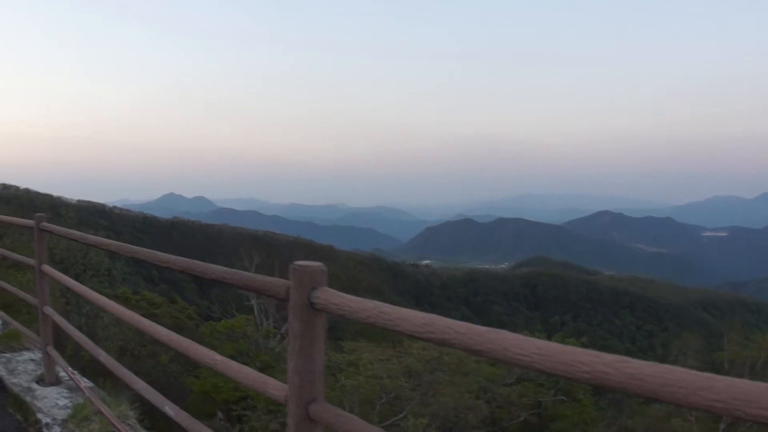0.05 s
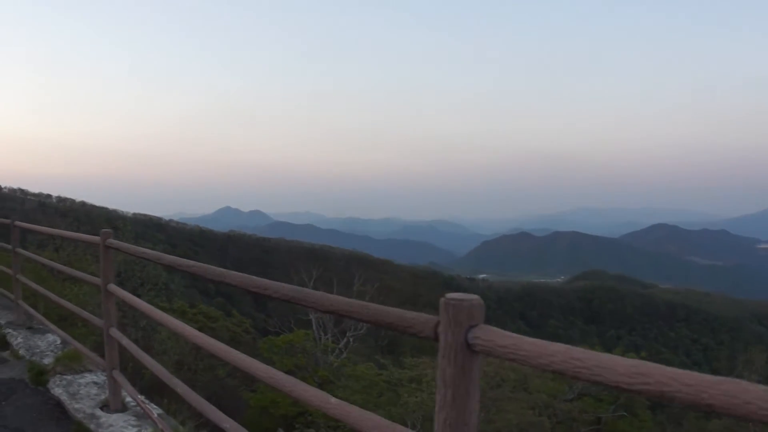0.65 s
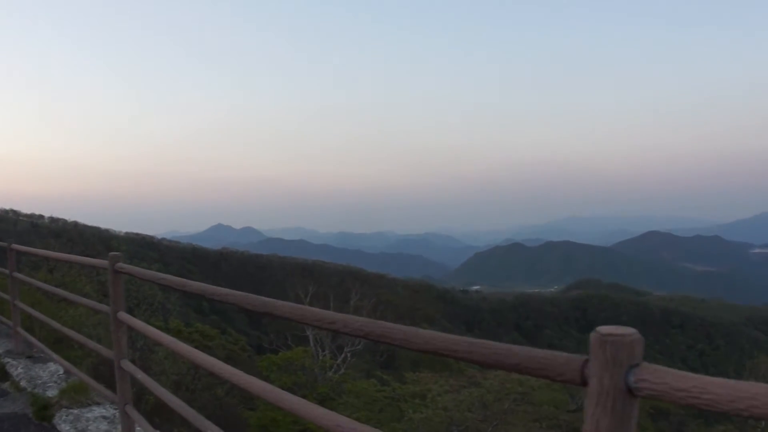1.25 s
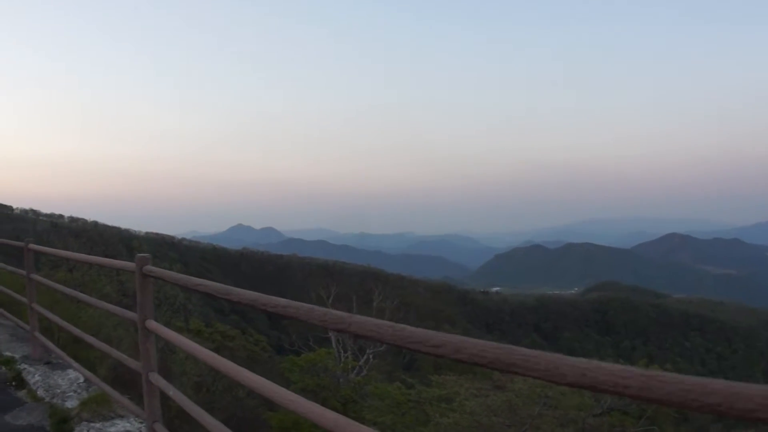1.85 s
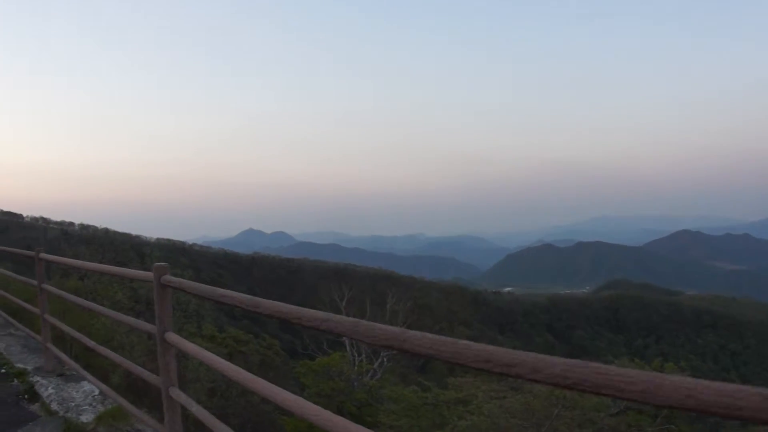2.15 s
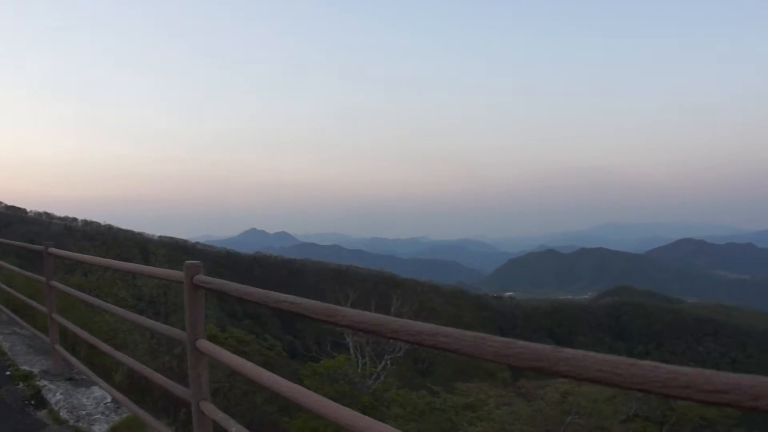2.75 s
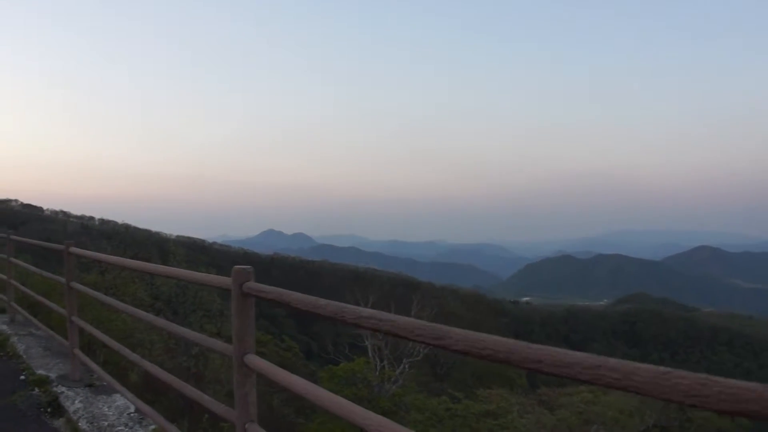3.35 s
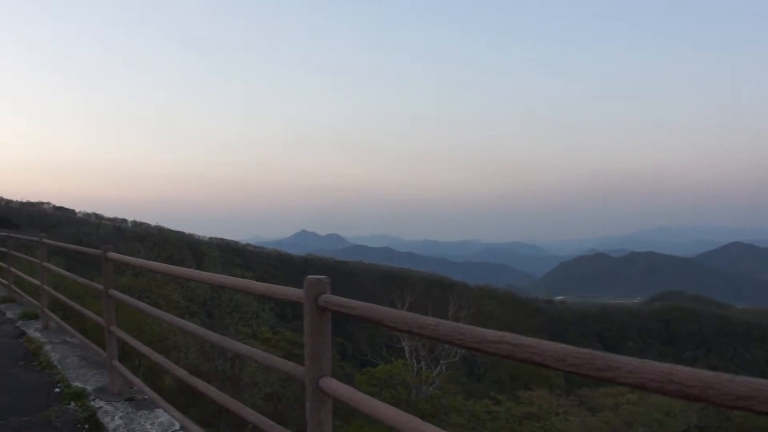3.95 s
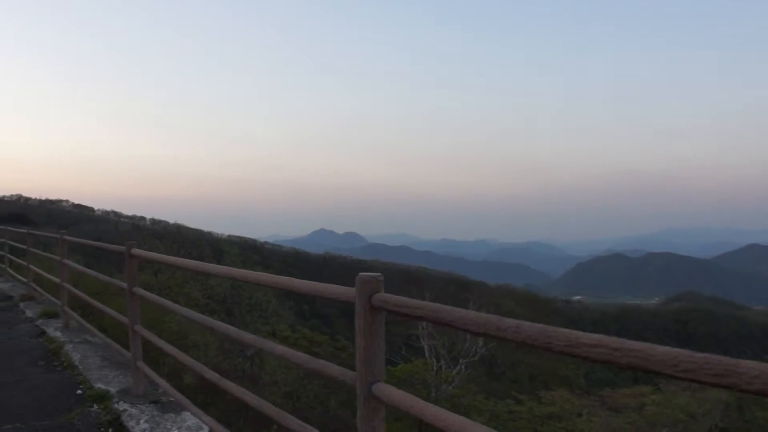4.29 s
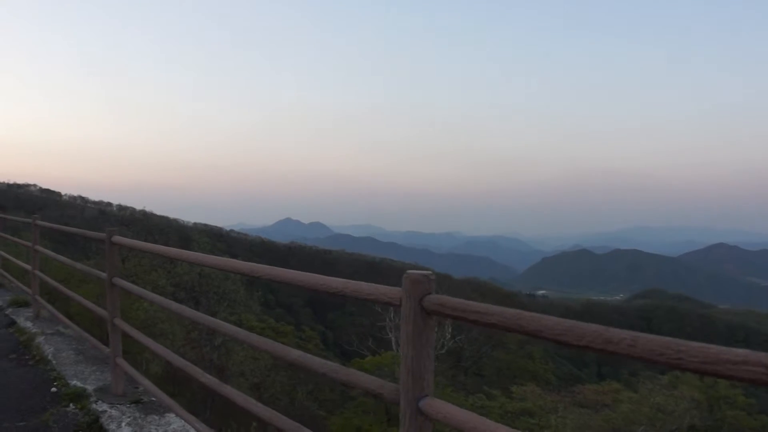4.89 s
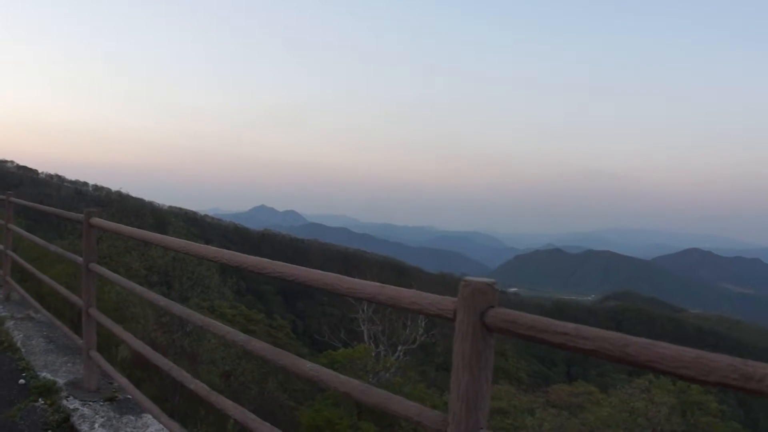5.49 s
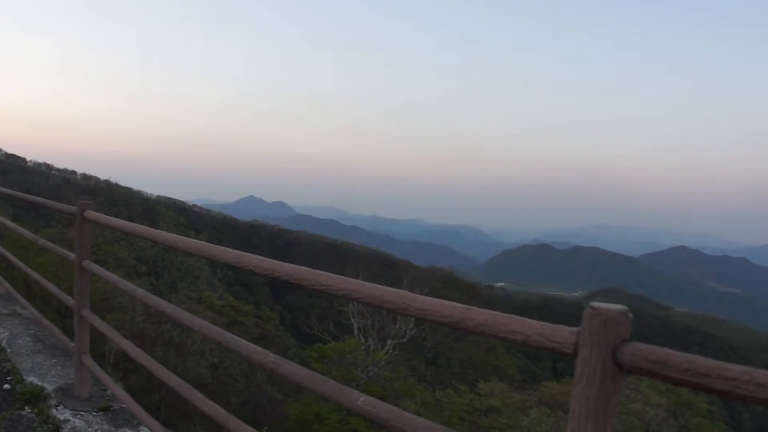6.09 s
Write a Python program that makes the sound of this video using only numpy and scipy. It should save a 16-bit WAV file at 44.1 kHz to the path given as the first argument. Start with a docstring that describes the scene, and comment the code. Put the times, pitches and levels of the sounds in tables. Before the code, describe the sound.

Outdoors, a little bird trills quickly and goes on with arched and falling chirps over light wind rumble and faint rushing air.

```python
"""Songbird on a windy hillside

A small bird, a little to the right, sings a fast trill, then alternates arched and falling chirps;
rising chirps open and close the song. Each note is one sweep of the syrinx, filtered by the throat
resonance and scattered by the trees. Behind it are a distant rush of air and one faint call;
close by, wind rumbles on a hand-held microphone, with a few ticks and scuffs."""
import sys
import numpy as np
from scipy import signal
from scipy.fft import rfft, irfft
from scipy.io import wavfile
from scipy.ndimage import uniform_filter1d

SR = 44100
rng = np.random.default_rng(int(sys.argv[2]) if len(sys.argv) > 2 else 0)


def digitize_waveform(pressure):
    """Quantize a signal to 16-bit integers and store it at the path in sys.argv[1].

    Rows of a 2-D input are taken as channels; values are limited to [-1, 1].
    """
    field = np.atleast_2d(pressure).T
    bounded = np.clip(field, -1, 1)
    quanta = np.round(bounded * 32767).astype(np.int16)
    wavfile.write(sys.argv[1], SR, quanta)


N = 274743
TIME = np.arange(N) / SR
FREQ = np.maximum(np.arange(N // 2 + 1) * SR / N, 1)


def undb(db):
    """Amplitude ratio of a level in decibels."""
    return 10 ** (np.asarray(db) / 20)


def unit(x):
    """Normalisation to rms 1."""
    return x / np.sqrt(np.mean(x ** 2))


def over_log(points, hz):
    """Interpolation of (f, value) points on a logarithmic frequency axis."""
    f, value = np.transpose(points)
    return np.interp(np.log(hz), np.log(f), value)


def bell(t, sigma):
    """Gaussian envelope of height 1 at t = 0."""
    return np.exp(-np.minimum((t / sigma) ** 2 / 2, 20))


def ease(x):
    """Raised-cosine step from 0 to 1."""
    return np.sin(np.pi / 2 * np.clip(x, 0, 1)) ** 2


def resonance(hz, width):
    """Magnitude response of a steep band-pass resonance."""
    return 1 / (1 + ((FREQ / hz - hz / FREQ) * hz / width) ** 4)


def noise(gain):
    """Spectral shaping of white noise, at rms 1."""
    return unit(irfft(rfft(rng.standard_normal(N)) * gain, N))


def drift(cutoff_hz):
    """Low-pass noise: a smooth random modulator of rms 1."""
    return noise(1 / (1 + (FREQ / cutoff_hz) ** 4))


def stereo_noise(spectrum, correlation):
    """Partial coherence: the ratio of common to opposed noise sets the channels' correlation."""
    mid, side = rfft(rng.standard_normal((2, N))) * undb(over_log(spectrum, FREQ))
    mid, side = mid * np.sqrt(1 + correlation), side * np.sqrt(1 - correlation)
    return unit(irfft(np.array([mid + side, mid - side]), N))


def pan(db):
    """Channel gains for a level difference, left minus right."""
    return undb(np.array([[db], [-db]]) / 2)


def delay(x, s):
    """Propagation delay of s seconds."""
    return np.interp(TIME - s, TIME, x, left=0)


def tree_echoes(x, start_s, t60):
    """Scattering by trunks and branches: sparse, exponentially decaying echoes, partly coherent."""
    t = TIME[:2 * SR]
    taps = rng.standard_normal((3, len(t))) * (rng.random((3, len(t))) < .05)
    response = (taps[0] + 0.68 * taps[1:]) * np.exp(-np.log(1000) * t / t60) * (t > start_s)
    return signal.fftconvolve(x[None], unit(response) / np.sqrt(len(t)), axes=1)[:, :N]


# Spectrum of the distant air: f/Hz, relative spectral level/dB
RUSH_SPECTRUM = [(100, 5), (250, 5), (450, 1.5), (750, 0.5), (1150, 3), (1700, -1), (2500, -2.5),
                 (4000, -11.5), (6000, -19.5), (10000, -36)]
# Likeness of its two channels: f/Hz, correlation coefficient
RUSH_CORRELATION = [(100, 0.93), (400, 0.79), (800, 0.8), (1300, 0.075), (3000, 0.31), (8000, 0.049)]


def distant_air():
    """Flow noise of air and leaves swells; a growing time difference draws it to the left."""
    swell = np.interp(TIME, [4.08, 5.73], [0, 1])
    left, right = stereo_noise(RUSH_SPECTRUM, over_log(RUSH_CORRELATION, FREQ))
    right = delay(right, s=.0001 + .00009 * swell)
    level_db = -54.5 + 6 * swell + 1.22 * drift(21.5)
    return np.array([left, right]) * undb(level_db) * pan(1.0)


# Spectrum of the microphone hiss: f/Hz, relative spectral level/dB
HISS_SPECTRUM = [(1000, -15.5), (4000, 1.5), (7000, 1), (11000, -0.5), (16000, -1)]


def microphone_hiss():
    """Self-noise: steady, broadband and almost uncorrelated between the channels."""
    return stereo_noise(HISS_SPECTRUM, correlation=0.06) * undb(-58.5)


def whine(first_s=0.26, period_s=1.525, length_s=.33):
    """Periodic gating of narrow-band noise: a faint high whine comes and goes."""
    gate = uniform_filter1d(1. * ((TIME - first_s) % period_s < length_s), size=2000)
    return gate * noise(resonance(hz=11400, width=800)) * undb(-73.5)


# Spectrum of the buffeting: f/Hz, relative spectral level/dB
BUFFET_SPECTRUM = [(8.8, -40), (15, -3), (38, 0.5), (54, 3.5), (97, -5.5), (147, -13.5), (179, -17),
                   (211, -19), (300, -24.5), (390, -68), (660, -120)]
# Slow course of the wind: t/s, relative level/dB
GUSTS = [(0.0, -50), (0.29, -54), (0.69, -45.5), (0.99, -50), (2.27, -51.5), (2.41, -47.5), (3.42, -49.5),
         (3.61, -50), (4.56, -56.5), (5.52, -51), (5.62, -52), (6.23, -50.5)]
# Single puffs on top of it: t/s, level rise/dB, Gaussian half-width/s
WIND_PUFFS = [(2.76, 4.5, .03), (2.94, 3.5, .025), (3.25, 5, 0.052), (5.372, 17, 0.033), (5.54, 9.5, .016),
              (6.2, 10, 0.012)]


def wind(gain_db=3, eddy_db=2, crossover_hz=115):
    """Turbulent pressure fluctuations buffet the microphone, a little more on the right."""
    gust_db = np.interp(TIME, *np.transpose(GUSTS)) + gain_db + eddy_db * drift(cutoff_hz=6)
    gust_db += sum(db * bell(TIME - s, width) for s, db, width in WIND_PUFFS)
    rumble = stereo_noise(BUFFET_SPECTRUM, correlation=over_log([(60, 0.78), (130, 0.88)], FREQ))
    rumble /= np.sqrt(uniform_filter1d(np.mean(rumble ** 2, axis=0), size=5000))  # even out its power
    # large eddies follow each gust fully, small ones only in part
    large = irfft(rfft(rumble) / (1 + (FREQ / crossover_hz) ** 6), N)
    small = rumble - large
    mean_db = np.mean(gust_db)
    small_db = mean_db + 0.57 * (gust_db - mean_db) - 1.5
    return large * undb(gust_db) * pan(-2.0) + small * undb(small_db) * pan(-0.51)


# Small dry ticks: t/s, level/dB, centre f/Hz, decay time/s
HANDLING_TICKS = [(0.085, -32, 2540, 0.00081), (3.02, -45, 1180, 0.0053), (3.349, -46, 1110, 0.0026),
                  (4.301, -45, 870, 0.0023), (4.381, -42.5, 1460, 0.0013), (4.4468, -41.5, 1500, 0.0018),
                  (4.543, -44.5, 1400, 0.0031), (4.554, -41, 2600, 0.0031), (4.928, -46.5, 1150, 0.0024),
                  (5.814, -42.5, 1460, 0.004), (6.112, -41.5, 1390, .0008)]
# Soft scuffs and bumps: t/s, level/dB, centre f/Hz, Gaussian half-width/s
HANDLING_SCUFFS = [(1.236, -49.5, 1040, 0.01), (1.56, -46, 390, 0.0035), (2.465, -50.5, 530, 0.0052),
                   (3.108, -52, 445, 0.013), (3.27, -47, 137, 0.055), (3.786, -57, 830, 0.055),
                   (4.785, -53, 790, 0.028)]


def handling():
    """Band-limited transients of handling: ticks decay exponentially, scuffs swell and fade."""
    out = np.zeros(N)
    for s, db, hz, decay in HANDLING_TICKS:
        age = np.maximum(TIME - s, 0)
        burst = rng.standard_normal(N) * (age > 0) * np.exp(-np.minimum(age / decay, 20))
        tick = irfft(rfft(burst) * resonance(hz, width=0.88 * hz), N)
        out += undb(db) * unit(tick) * np.sqrt(decay * SR / N)
    for s, db, hz, width_s in HANDLING_SCUFFS:
        out += undb(db) * noise(resonance(hz, width=.9 * hz)) * bell(TIME - s, width_s)
    return out * pan(.3)


def far_call(peak_s=2.101, centre_hz=944, octaves_per_s=17):
    """Exponential frequency sweep: one faint, low, upslurred whistle further off."""
    t = TIME - peak_s
    hz = centre_hz * 2 ** np.clip(octaves_per_s * t, -1, 1)
    hz *= 1 + 0.022 * drift(180)
    tone = np.sin(2 * np.pi * np.cumsum(hz) / SR)
    call = np.sqrt(2) * tone * undb(-47) * bell(t, sigma=0.011)
    return call + undb(-5) * tree_echoes(call, start_s=0.0029, t60=0.12)


def gesture(stretch, lead_s, tail_s, scoop, scoop_s, drop, drop_s, clear_s, husk, peak_s, swell_s):
    """Frequency and amplitude modulation of one note about its pitch crest; stretch scales all times."""
    t = np.arange(-int(lead_s * stretch * SR), int(tail_s * stretch * SR)) / SR / stretch
    pitch_ratio = 1 - scoop * ease(-t / scoop_s) - drop * ease(t / drop_s)
    # the rasp clears about clear_s before the crest, down to the share husk
    rasp = husk + (1 - husk) / (1 + np.exp((t + clear_s) / 0.0022))
    return t * stretch, pitch_ratio, rasp, bell(t - peak_s, swell_s)


# Transfer function of throat and beak: f/Hz, gain/dB
THROAT_RESPONSE = [(1000, -30), (1700, -16), (2200, -10), (3000, -2.5), (3700, -3), (4700, -11.5),
                   (6000, -15), (7200, -30.5), (9500, -15.5), (13000, -41)]


def syrinx(notes, shape, waver, onset_waver, rolloff_db, rough, gape, fray_db, fray_band_hz, forest_db):
    """Source and filter: a rasp clears to a whistle, shaped by the throat. Returns (direct, forest)."""
    out = np.zeros((2, N))
    flutter, buzz, grit = drift(220), drift(317), drift(670)
    fray = undb(fray_db) * noise(resonance(*fray_band_hz))  # centre, width
    for crest_s, crest_hz, stretch, whistle_db, overtone_db, rasp_db in notes:
        t, pitch_ratio, rasp, swell = gesture(stretch, **shape)
        i = int((crest_s + t[0]) * SR) + np.arange(len(t))
        hz = crest_hz * pitch_ratio * (1 + waver * flutter[i] + onset_waver * rasp * buzz[i])
        phase = 2 * np.pi * np.cumsum(hz) / SR
        envelope = rasp * undb(rasp_db) + (1 - rasp) * swell * undb(whistle_db)
        envelope *= np.sqrt(2) * signal.windows.tukey(len(i), .28)
        envelope *= (1 + rough * rasp * grit[i]) / np.hypot(1, rough * rasp)  # membranes beat unevenly
        note = np.sqrt(rasp) * fray[i]  # and their tone frays into noise
        for k in range(1, 5):
            clear_db = overtone_db - whistle_db + rolloff_db * (k - 2)
            partial_db = 0 if k == 1 else (1 - rasp) * clear_db - 1.3 * rasp * (k - 2)
            throat_db = over_log(THROAT_RESPONSE, k * hz / gape)  # a wider beak lifts the resonance
            note += undb(partial_db + throat_db) * np.sin(k * phase)
        out[0, i] += envelope * note
        out[1, i] += envelope * note * undb(forest_db - 1.3 * rasp)  # whistle carries further than rasp
    return out


# Rising notes: crest t/s, crest f/Hz, stretch, source level/dB of whistle, overtone, rasp
RISING_NOTES = [(.4255, 3550, .96, -35.5, -54, -44.5), (5.562, 3454, .88, -41.5, -34, -44),
                (6.077, 3590, 1.05, -48.5, -43, -54.5)]


def rising_chirps():
    """Upward frequency sweeps that end just after the crest."""
    shape = dict(lead_s=.038, tail_s=0.0075, scoop=.62, scoop_s=0.033, drop=0.038, drop_s=0.01,
                 clear_s=0.014, husk=.03, peak_s=0.00089, swell_s=.035)
    return syrinx(RISING_NOTES, shape, waver=0.012, onset_waver=0.0073, rolloff_db=-15, rough=0.4,
                  gape=1.017, fray_db=-11.5, fray_band_hz=(4430, 1100), forest_db=-8.5)


# Falling notes: crest t/s, crest f/Hz, stretch, source level/dB of whistle, overtone, rasp
FALLING_NOTES = [(2.083, 2800, 0.94, -37.5, -63, -50), (2.379, 2830, .88, -38, -68, -50),
                 (2.944, 2902, 0.81, -36.5, -67, -44), (3.300, 2650, .86, -43.5, -52, -42.5),
                 (3.548, 2640, 0.97, -41, -55, -51), (3.856, 2684, 1.13, -41, -55, -50),
                 (4.142, 2707, 0.87, -40, -64, -43), (4.506, 2693, 0.86, -43.5, -60, -37),
                 (4.831, 2584, 0.74, -49, -45, -44.5)]


def falling_chirps():
    """Downward frequency sweeps after a short, rough rise; the whistle swells on the descent."""
    shape = dict(lead_s=0.019, tail_s=0.043, scoop=.36, scoop_s=0.0119, drop=.235, drop_s=0.027,
                 clear_s=0.0016, husk=0.05, peak_s=0.023, swell_s=0.02)
    return syrinx(FALLING_NOTES, shape, waver=0.022, onset_waver=0.033, rolloff_db=-4, rough=0.74,
                  gape=0.88, fray_db=-13.5, fray_band_hz=(3640, 2200), forest_db=-9.5)


# Arched notes: crest t/s, crest f/Hz, stretch, source level/dB of whistle, overtone, rasp
ARCHED_NOTES = [(1.919, 2993, 1.07, -33, -49, -48.5), (2.238, 3153, 0.98, -34.5, -53, -46),
                (2.677, 3487, .92, -37, -47, -45), (3.092, 3045, 0.96, -40.5, -43, -46.5),
                (3.431, 2954, 0.98, -40, -45, -44.5), (3.743, 3154, 1.05, -33, -46, -46.5),
                (4.037, 3100, .97, -33, -49, -42.5), (4.338, 3057, .92, -35, -45, -40.5),
                (4.695, 3004, 1.04, -37.5, -48, -38), (5.025, 3155, 1, -41, -64, -46.5)]


def arched_chirps():
    """Frequency sweeps up and down again; the whistle peaks near the crest."""
    shape = dict(lead_s=.029, tail_s=.02, scoop=.48, scoop_s=.027, drop=0.317, drop_s=0.0378,
                 clear_s=0.0093, husk=.008, peak_s=0.0012, swell_s=0.014)
    return syrinx(ARCHED_NOTES, shape, waver=.006, onset_waver=0.022, rolloff_db=-14, rough=0.11,
                  gape=0.93, fray_db=-19.5, fray_band_hz=(3580, 2100), forest_db=-9)


# Notes of the trill: crest t/s, stretch, source level/dB of whistle
TRILL_NOTES = [(.502, 0.72, -29.5), (0.578, 0.98, -30), (.652, 0.7, -29), (.731, 0.85, -27),
               (.810, 0.83, -25.5), (.893, 0.87, -24.5), (.976, 0.9, -26.5), (1.057, 1.2, -28),
               (1.138, 1.27, -27), (1.218, 1.3, -27), (1.297, 1, -26), (1.383, 1.12, -27),
               (1.477, 0.99, -25), (1.569, .95, -27.5), (1.658, 0.95, -29)]


def trill(base_hz=3098, sharp_hz=169, settle_s=0.045, sag_hz_per_s2=150.4):
    """A nearly periodic train of sweeps whose pitch starts sharp, settles, then sags ever faster."""
    notes = []
    for crest_s, stretch, whistle_db in TRILL_NOTES:
        age = crest_s - TRILL_NOTES[0][0]
        hz = base_hz + sharp_hz * np.exp(-age / settle_s) - sag_hz_per_s2 * age ** 2
        overtone_db = -50.5 + 6.5 * bell(age - 0.49, sigma=0.078)  # brighter in mid-phrase
        rasp_db = -37.5 - 27 * age
        notes.append((crest_s, hz, stretch, whistle_db, overtone_db, rasp_db))
    shape = dict(lead_s=.018, tail_s=0.026, scoop=.48, scoop_s=.021, drop=0.0726, drop_s=0.0264,
                 clear_s=0.0071, husk=0.0019, peak_s=0.013, swell_s=0.01)
    return syrinx(notes, shape, waver=0.0067, onset_waver=0.053, rolloff_db=-5.0, rough=0.73,
                  gape=0.95, fray_db=-18, fray_band_hz=(3680, 4700), forest_db=-9.5)


def songbird():
    """Multipath propagation: the song arrives from the right directly, off the ground and off trees."""
    direct, into_forest = rising_chirps() + trill() + arched_chirps() + falling_chirps()
    ground = undb(-11.5) * delay(direct, s=.0125)
    trunks = undb(-5.5) * tree_echoes(direct, start_s=0.0012, t60=.09)
    grove = tree_echoes(into_forest, start_s=0.016, t60=.45)
    far_slope = .5 * tree_echoes(into_forest, start_s=0.032, t60=1.25)
    left, right = direct + ground + trunks + grove + far_slope
    return np.array([left, np.roll(right, 1)]) * pan(-6.0)


def scene():
    """Linear superposition of all sources at the microphone."""
    return songbird() + far_call() + handling() + wind() + distant_air() + microphone_hiss() + whine()


def record(dry):
    """Band limiting by a steep low-pass filter."""
    cutoff_hz, edge_hz = 15780, 60
    return irfft(rfft(dry) * np.clip((cutoff_hz - FREQ) / edge_hz + .5, 0, 1), N)


dry = scene()
out = record(dry)
digitize_waveform(out)
```